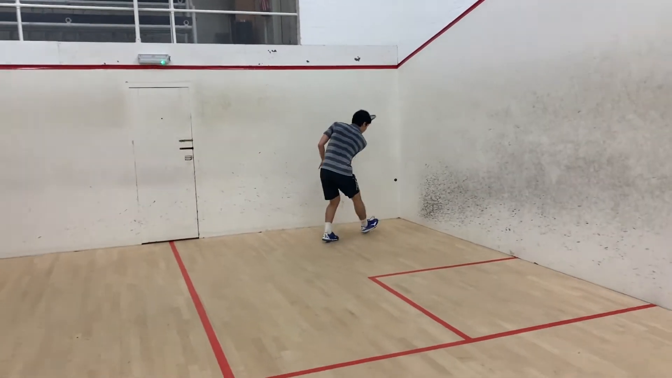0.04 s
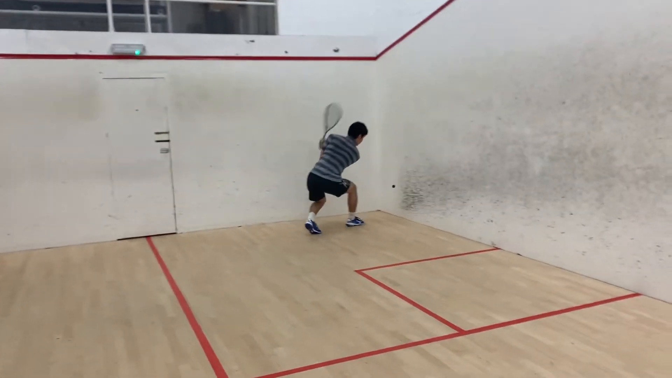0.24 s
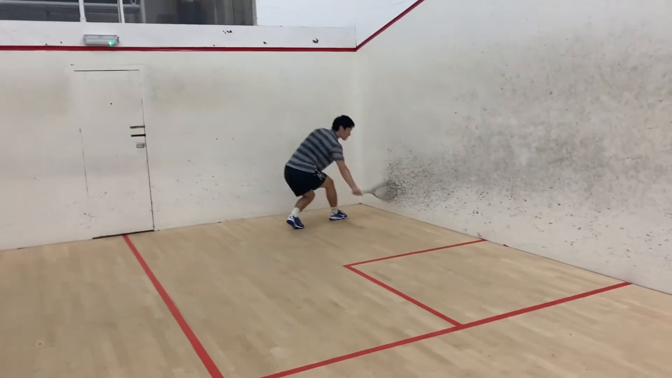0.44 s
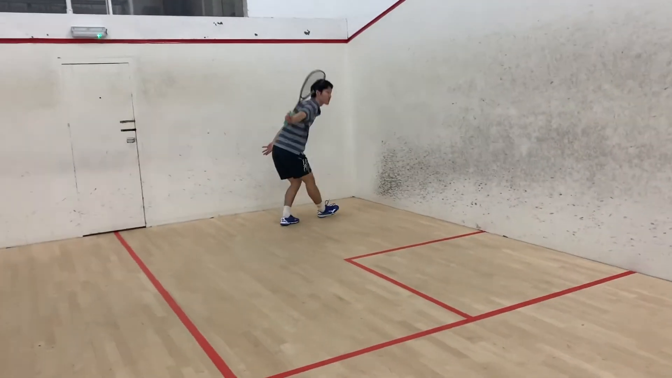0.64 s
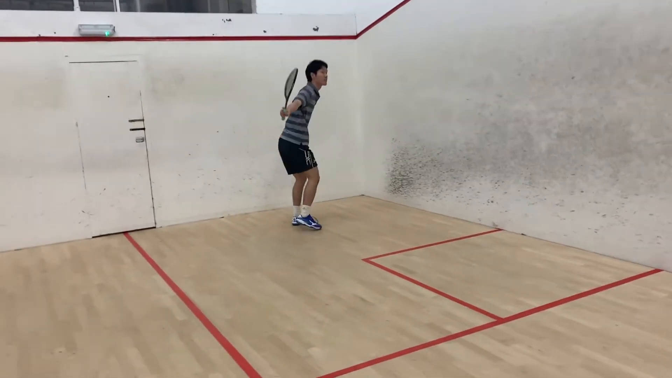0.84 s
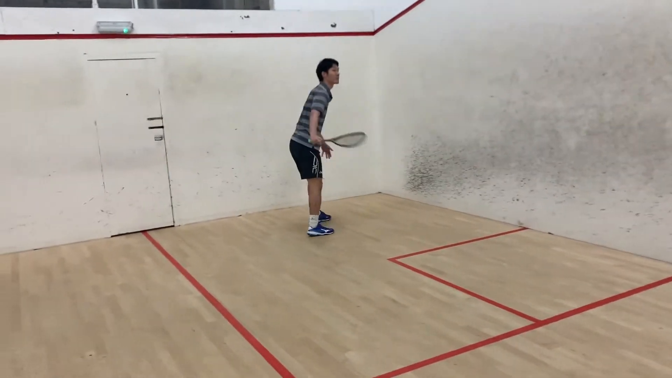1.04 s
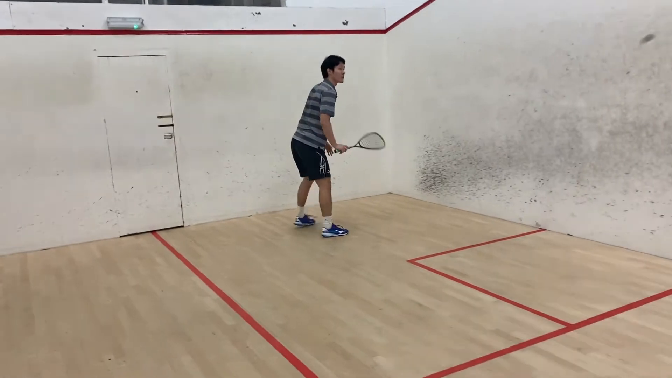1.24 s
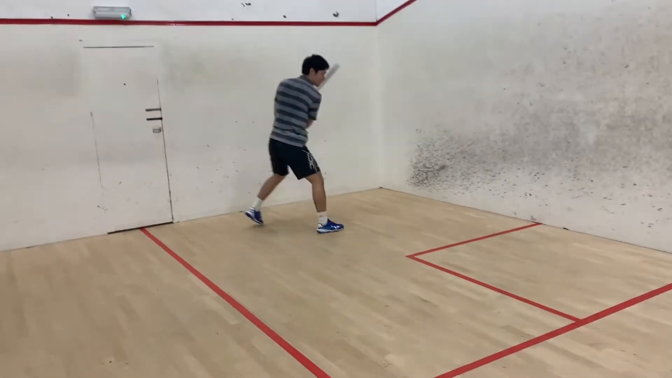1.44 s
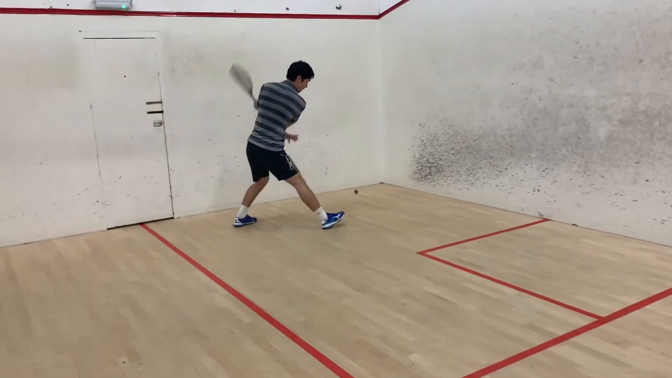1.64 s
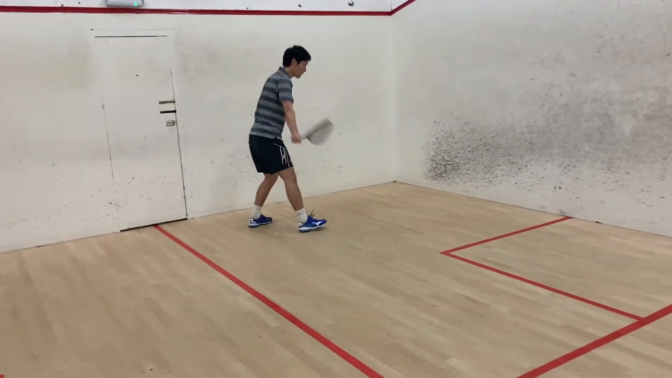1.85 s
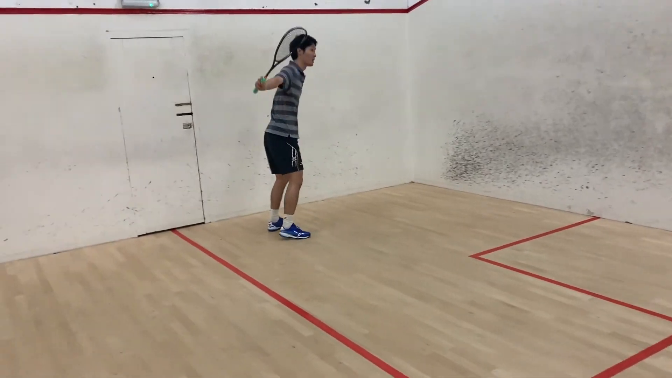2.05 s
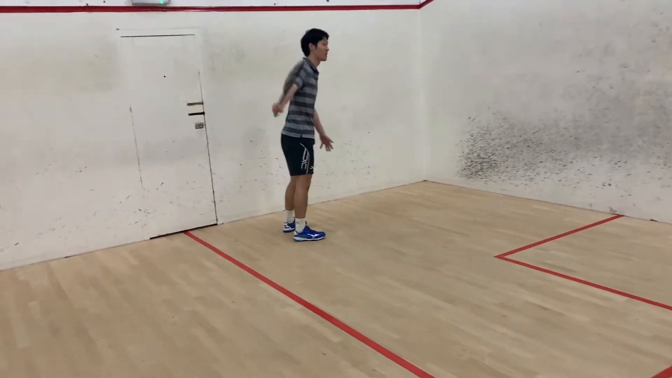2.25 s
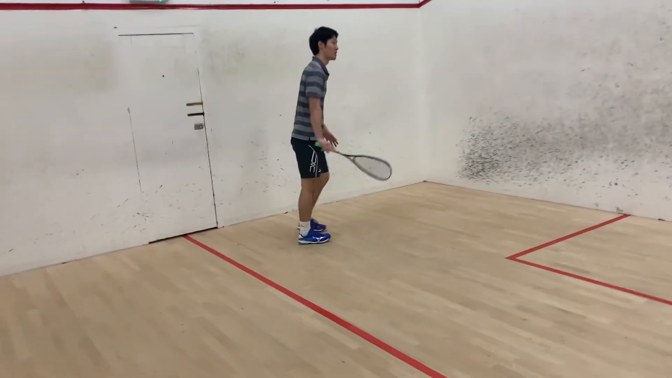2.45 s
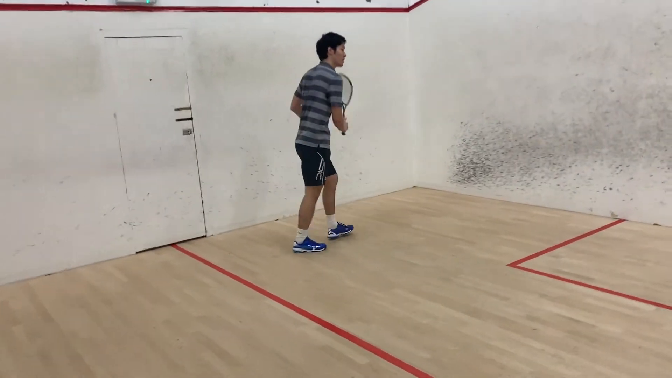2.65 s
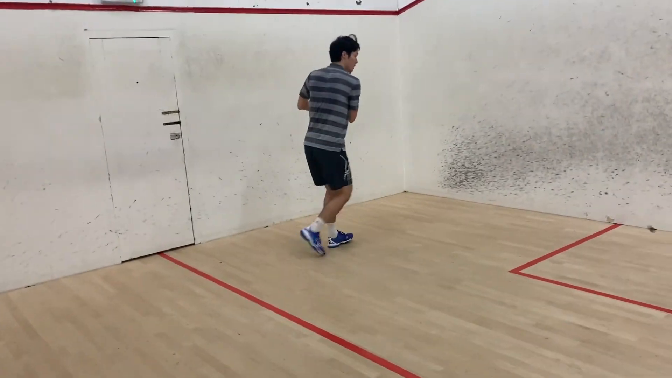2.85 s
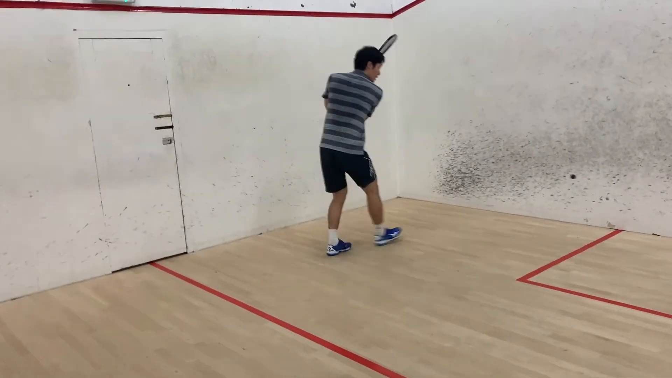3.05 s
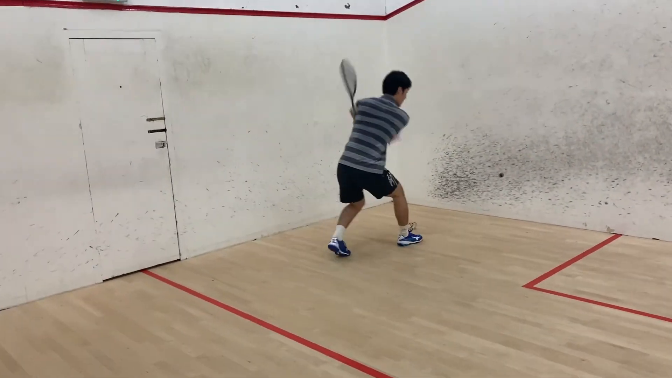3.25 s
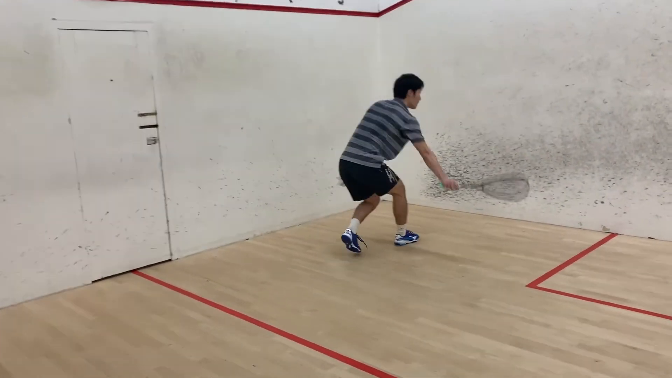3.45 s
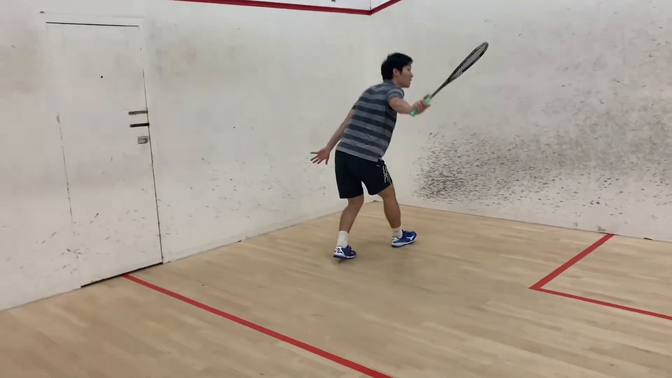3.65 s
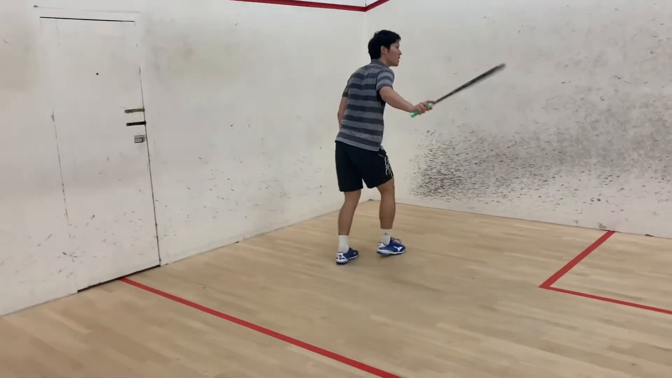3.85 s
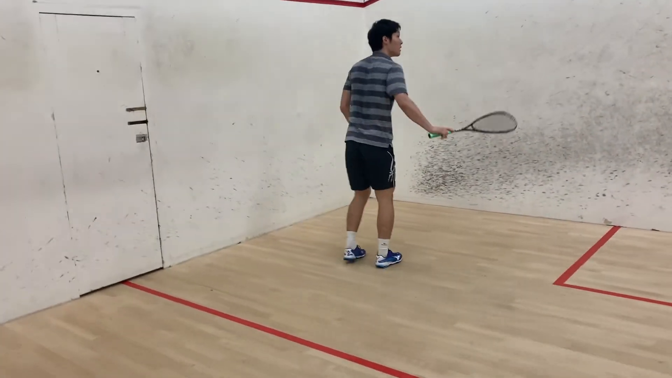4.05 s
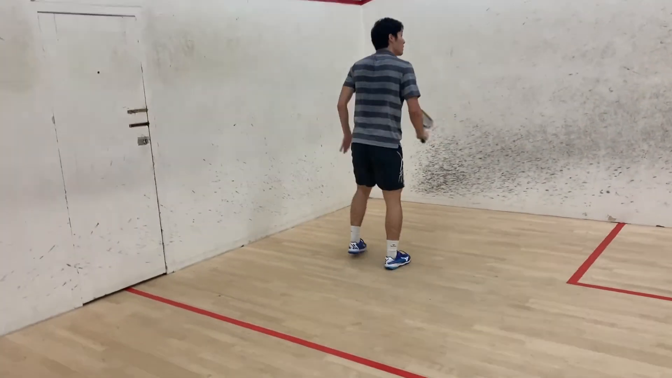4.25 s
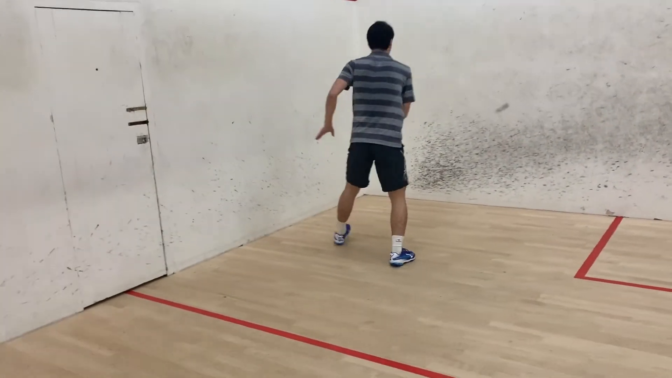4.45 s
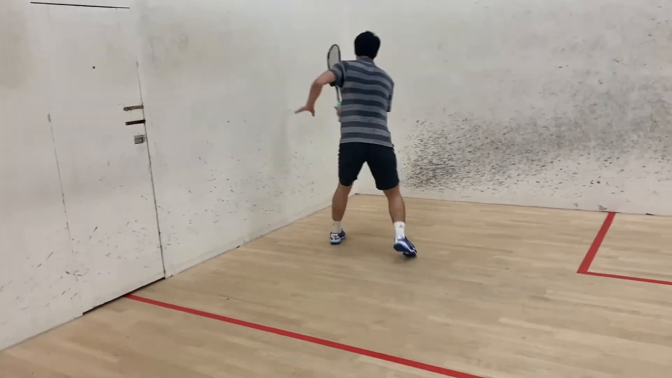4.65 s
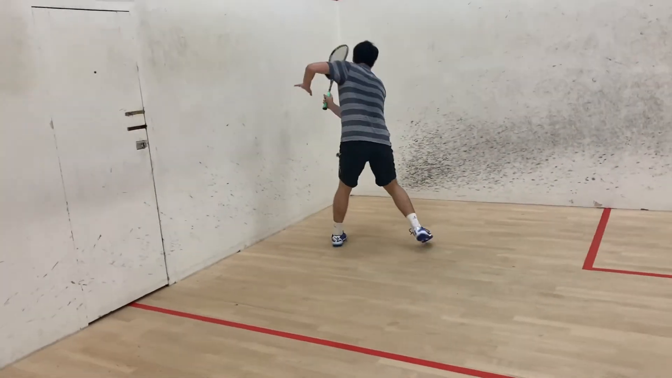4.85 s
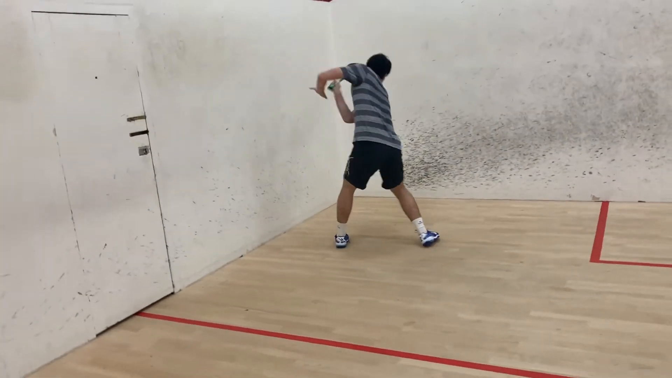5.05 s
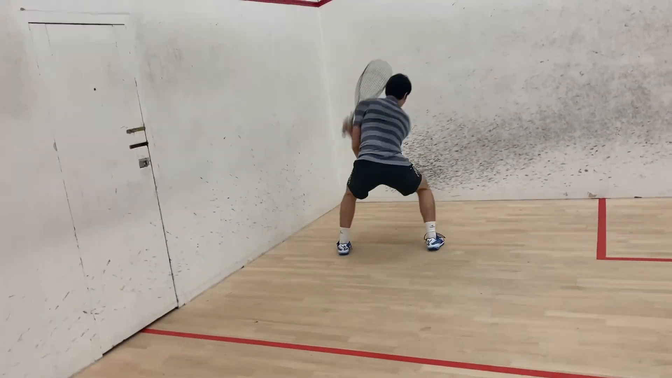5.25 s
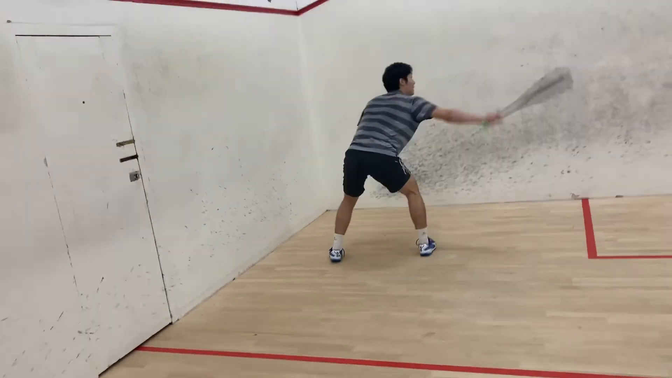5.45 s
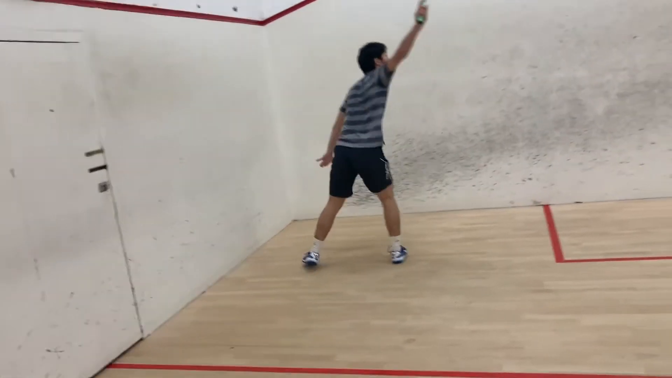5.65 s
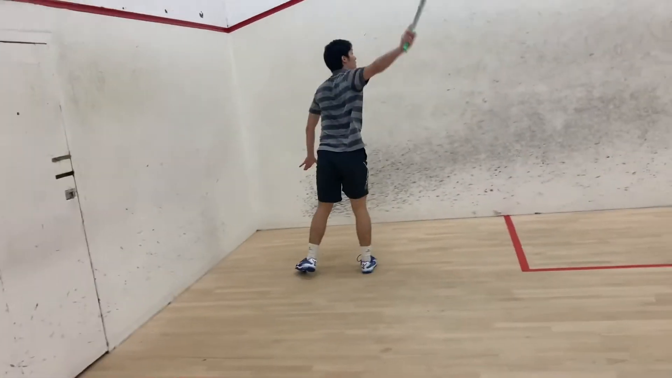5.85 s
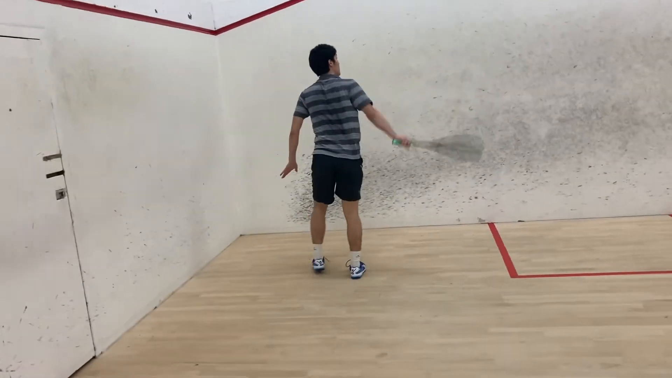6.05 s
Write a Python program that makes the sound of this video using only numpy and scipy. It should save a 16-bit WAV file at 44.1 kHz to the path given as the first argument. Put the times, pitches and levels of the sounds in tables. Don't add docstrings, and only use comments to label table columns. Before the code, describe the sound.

Squash practice in a bare, ringing court: four racket strikes, each followed by a hard crack on the wall, with shoe squeaks and wooden floor thuds.

```python
import sys
import numpy as np
from scipy import signal
from scipy.fft import rfft, irfft, next_fast_len
from scipy.io import wavfile
from scipy.ndimage import uniform_filter1d

SR = 44100
rng = np.random.default_rng(int(sys.argv[2]) if len(sys.argv) > 2 else 0)


def invert_db(level):
    return 10 ** (np.asarray(level, dtype=float) / 20)


def master_out(mix):
    frames = np.transpose(np.atleast_2d(mix))
    ceiling = np.clip(frames, -1, 1)
    pcm = np.round(ceiling * 32767).astype(np.int16)
    wavfile.write(sys.argv[1], SR, pcm)


N = 269451
LEAD = SR
ROOMS = 4
BLOW = np.ones(1)
SOUND_M_S, LENGTH_M, BREADTH_M = 343, 9.75, 6.4
ALONG_S, ACROSS_S = 2 * LENGTH_M / SOUND_M_S, 2 * BREADTH_M / SOUND_M_S

# f/Hz, lag/cycles
PORT_LAG = [(100, .02), (400, .09), (1000, .2), (2300, .14), (6000, .12), (8500, .5), (11000, 1),
            (13550, 1.5), (15900, 2), (18000, 2.4)]


def evened(x):
    return x / np.sqrt(np.mean(x ** 2) + 1e-20)


def peaked(x, db):
    return invert_db(db) * x / np.sqrt(uniform_filter1d(x ** 2, size=180).max() + 1e-20)


def read(points, hz):
    f, value = np.transpose(points)
    return np.interp(np.log(hz + 1), np.log(f + 1), value)


def add(mix, s, sound):
    part = mix[..., LEAD + round(s * SR):][..., :len(sound)]
    part += sound[:part.shape[-1]]


def coloured(x, colour, tilt_db=0.):
    hz = abs(np.fft.fftfreq(8192, 1 / SR))
    octaves = np.log2(np.clip(hz, 150, 9000) / 1000)
    log_gain = np.log(invert_db(read(colour, hz) + tilt_db * octaves))
    taps = np.fft.ifft(np.exp(np.conj(signal.hilbert(log_gain)))).real[:3000]
    return signal.oaconvolve(x, taps)[:max(len(x), 3000)]


def ring(hz, width_hz):
    t = np.arange(3000) / SR
    return np.sin(2 * np.pi * hz * t) * np.exp(-np.pi * width_hz * t)


def knock(db, hz, length_s):
    u = np.linspace(0, 1, round(length_s * SR))
    swell = np.sin(np.pi * u ** 0.66)
    return invert_db(db) * np.sqrt(2) * swell * np.sin(2 * np.pi * hz * length_s * u * (1.03 - .03 * u))


def pop(db, hz, delay_s, rel_db, cycles):
    return delay_s, knock(db + rel_db, hz, cycles / hz)


def spread(z, hz):
    # f/Hz, level/dB
    side_level = [(60, -9), (130, -12.5), (290, -5.5), (640, 2.5), (1410, 3.5), (3100, 1.5), (6820, 0),
                  (15000, 9)]
    # f/Hz, share
    alike = [(6500, 0.19), (8300, 0.99), (17000, .98)]
    mid, side = z[0], z[1] * invert_db(read(side_level, hz))[:, None]
    share = np.clip(read(alike, hz), 0, 1)[:, None]
    shift = np.exp(1j * np.pi * read(PORT_LAG, hz))[:, None]
    diffuse = np.array([mid + side, mid - side])
    one_wave = np.sqrt(2) * np.array([mid / shift, mid * shift])
    both = np.sqrt(1 - share ** 2) * diffuse + share * one_wave
    return signal.istft(both, SR, nperseg=2 * len(hz) - 2)[1]


def hum():
    # f/Hz, level/dB per Hz
    hum_colour = [(18, -49), (30, -6), (202, -10), (550, -21), (930, -15.5), (3430, -31), (7090, -50),
                  (8450, -49), (12000, -58), (15600, -97), (22000, -120)]
    hz, _, z = signal.stft(rng.standard_normal((2, N)), SR, nperseg=2048)
    return invert_db(-47.5) * evened(spread(z * invert_db(read(hum_colour, hz))[:, None], hz)[:, :N])


def court():
    # f/Hz, t60/s
    decay = [(60, 3.34), (130, 1.16), (250, 2.83), (500, 3.47), (1000, 3.46), (2000, 2.76), (4000, 1.93),
             (6000, 1.254), (9000, 1.056), (14000, 0.4)]
    t = np.arange(round(2.6 * SR)) / SR
    density = np.clip((t / .09) ** 2, .15, 1)
    taps = rng.standard_normal((2, len(t))) * (rng.random((2, len(t))) < density) / np.sqrt(density)
    flutter = 1 + 0.096 * np.cos(2 * np.pi * 56 * t) * np.exp(-t / 0.51)
    build_up = 1 - np.exp(-t / .014)
    fade_out = signal.windows.tukey(2 * len(t), .2)[len(t):]
    taps *= flutter * build_up * fade_out
    hz, frame_s, z = signal.stft(taps, SR, nperseg=512)
    return spread(z * invert_db(-60 * frame_s / read(decay, hz)[:, None]), hz) / 22


def scattered(sound, length_s=0.0022, ragged=0.26):
    t = np.arange(900) / SR
    taps = ragged * rng.standard_normal(900) * np.exp(-t / length_s) + (t == 0)
    return signal.oaconvolve(sound, taps / np.linalg.norm(taps))


def ports(x, aligned=0.65):
    size = next_fast_len(len(x))
    shift = np.exp(1j * np.pi * read(PORT_LAG, np.fft.rfftfreq(size, 1 / SR)))
    pair = irfft(rfft(x, size) * np.array([1 / shift, shift]), size)[:, :len(x)]
    round_body = np.array([np.roll(x, 5), np.roll(x, -5)])
    return aligned * pair + (1 - aligned) * round_body


def squeak(length_s, start_hz, db, octave_db):
    n = round(length_s * SR)
    wobble, chatter = uniform_filter1d(rng.standard_normal((2, 4000)), size=60)[:, :n]
    pitch_hz = np.linspace(start_hz, start_hz * (1 - .024), n) * (1 + 0.06 * wobble)
    turn = 2 * np.pi * np.cumsum(pitch_hz) / SR
    swell = np.linspace(0, 1, n) ** 0.93 * signal.windows.tukey(n, .3) * (1 + 1.6 * chatter)
    return invert_db(db) * np.sqrt(2) * swell * (np.sin(turn) + invert_db(octave_db) * np.sin(2 * turn))


def thud(db, tilt_db, board_hz):
    # f/Hz, level/dB per Hz
    thud_colour = [(40, -42.5), (90, -2.5), (200, 2), (400, -12.5), (1000, -27), (3000, -22.5), (8000, -35),
                   (16000, -37.5)]
    tick = peaked(coloured(BLOW, thud_colour, tilt_db), -6.5)
    boards = peaked(ring(board_hz, 25.3) + 0.32 * ring(board_hz * 1.45, 39), -13)
    give = 1 - np.exp(-np.arange(3000) / SR / 0.0017)
    return peaked(tick + boards * give, db)


def board_knocks(db, hz):
    returns = [(0, 0), (ALONG_S, -2.5), (2 * (LENGTH_M + BREADTH_M) / SOUND_M_S, -5)]  # t/s, level/dB
    return [pop(db + d, hz, .005 + s, rel_db=-1.5, cycles=4.5) for s, d in returns]


def swish(db, length_s=0.091):
    # f/Hz, level/dB per Hz
    swish_colour = [(100, -31), (400, 13.5), (1200, 3.5), (3500, -1), (8000, -6), (16000, -17)]
    t = np.arange(-length_s, .02, 1 / SR)
    speed = np.exp(np.minimum(t / 0.02, -t / 0.0034))
    air = coloured(rng.standard_normal(len(t)), swish_colour)
    return invert_db(db) * evened(air)[:len(t)] * speed


def stroke(db, ball_hz):
    # f/Hz, width/Hz, level/dB
    racket = [(882, 63, -1.5), (1050, 42, -8.5), (1626, 53, -17), (2320, 290, -15), (3400, 450, -17),
              (4500, 410, -11)]
    # f/Hz, level/dB per Hz
    stroke_colour = [(40, -13.5), (100, -16), (340, 1.5), (640, -8), (1060, -8.5), (1300, -5.5),
                     (1900, -17), (6500, -23.5), (11000, -26), (16000, -31.5)]
    slap = coloured(BLOW, stroke_colour, tilt_db=-.6)
    modes = ring(ball_hz, 82) + sum(invert_db(d + 1.2) * ring(f, w) for f, w, d in racket)
    return peaked(peaked(slap, 0) + peaked(modes, -7), db)


def stroke_followers(db, strings_hz, ball_hz):
    # t/s, level/dB
    snaps = [(.0008, -9), (.0028, -9), (.007, -11), (.020, -14)]
    string_ping = pop(db, strings_hz, delay_s=.0008, rel_db=-5, cycles=7)
    ball_pop = pop(db, ball_hz, delay_s=.003, rel_db=-4, cycles=4)
    slaps = [(s, scattered(crack(db + d, tilt_db=.7), .0015, .3)) for s, d in snaps]
    return [string_ping, ball_pop] + slaps


def crack(db, tilt_db, ring_hz=300, ring_db=-40):
    # f/Hz, level/dB per Hz
    crack_colour = [(40, -39), (100, -12), (350, 1), (700, -5), (1050, -7), (1220, -16.5), (1700, -9),
                    (2300, -11.5), (4000, -16), (7400, -21), (12000, -20), (16000, -32.5)]
    click = coloured(BLOW, crack_colour, tilt_db)
    rings = ring(ring_hz, 0.19 * ring_hz) + 0.74 * ring(2.44 * ring_hz, 0.3 * ring_hz)
    return peaked(peaked(click, 0) + peaked(rings, ring_db), db)


def crack_returns(db, tilt_db, wall_hz, side_m):
    side_s, floor_s = side_m / SOUND_M_S, .9 / SOUND_M_S
    # t/s, level/dB; first the slap at the front of the crack
    paths = [(.0009, -3.5), (floor_s, -1.2), (side_s, -1.8), (ACROSS_S, -6), (ALONG_S, -7)]
    clicks = [(s, scattered(crack(db + d, tilt_db + 1.3), 0.002, 0.29)) for s, d in paths]
    booms = [pop(db - 5 * tilt_db, 370, s, d, cycles=3.1) for s, d in [(.0025, -7.5), (ACROSS_S + .003, -7)]]
    bunches = [(side_s - .002, -8 + 3 * tilt_db), (ACROSS_S + .002, -3), (ALONG_S - .002, -5.5)]
    clangs = [(s, knock(db + d, .86 * wall_hz, .011)) for s, d in bunches]
    flash = knock(db - 12 + 4 * tilt_db, 2.35 * wall_hz, .0075)
    return clicks + booms + clangs + [(0, flash), (side_s, flash)]


def scene():
    # t/s, peak level/dB, court level/dB, string bed f/Hz, ball f/Hz
    strokes = [
        (.460, -11.5, -5, 876, 385),
        (1.837, -20, 0.3, 1075, 345),
        (3.460, -17, -3.5, 790, 320),
        (5.422, -10.5, -6, 970, 292),
    ]
    # t/s, peak level/dB, brightness/dB per octave, wall ring f/Hz, side wall detour/m
    cracks = [
        (-.95, -16.5, .1, 912, 3.5),
        (.695, -13.5, .22, 700, 3.8),
        (2.057, -12, -.2, 357, 2.7),
        (3.674, -13, .2, 860, 2.1),
        (5.602, -13.5, 2, 1000, 5),
    ]
    # t/s, peak level/dB, brightness/dB per octave, court level/dB, board f/Hz
    thuds = [(0.068, -41, -1.2, -1, 170), (1.577, -47, 5, -6, 257), (1.640, -35.5, -1.1, 1, 137),
             (1.654, -28, -1.35, -4.5, 126), (2.886, -26.5, -1.14, -5, 152), (3.227, -34, -1.4, -5, 168),
             (4.56, -43, -1.9, 2, 116), (4.702, -27, 0.46, -9, 255), (4.724, -24.5, -3, -7, 165),
             (4.968, -34, -3, -13, 235), (5.002, -35, -8, -6, 116), (5.19, -44, -10, -6, 90)]
    # t/s, length/s, start f/Hz, level/dB, octave level/dB
    squeaks = [
        (1.781, .015, 3930, -21.5, -11),
        (1.789, 0.045, 4480, -23, -8),
        (1.821, .031, 4405, -11, -16),
        (1.972, 0.016, 3370, -27, 1.5),
        (3.395, .08, 1105, -38, -22),
    ]
    courts, building = [court() for _ in range(ROOMS)], hum()
    direct, sent = np.zeros(LEAD + N), np.zeros((ROOMS, LEAD + N))
    sounds, near = [], []
    for s, db, court_db, strings_hz, ball_hz in strokes:
        sounds += [(s, stroke(db, ball_hz), court_db), (s - .09, swish(.6 * db - 22), -12)]
        frame_hum = ring(1080, 22)
        add(sent[1], s, peaked(frame_hum, db + court_db - 19))
        near += [(s, stroke_followers(db, strings_hz, ball_hz))]
    for s, db, tilt_db, wall_hz, side_m in cracks:
        ring_db = -17 + 6.5 * tilt_db
        sounds += [(s, crack(db, tilt_db, wall_hz, ring_db), -2)]
        near += [(s, crack_returns(db, tilt_db, wall_hz, side_m))]
    for s, db, tilt_db, court_db, hz in thuds:
        sounds += [(s, thud(db, tilt_db, hz), court_db)]
        near += [(s, board_knocks(db, hz))]
    for k, (s, sound, court_db) in enumerate(sounds):
        add(direct, s, scattered(sound))
        add(sent[k % ROOMS], s, invert_db(court_db) * sound)
    for s, length_s, hz, db, octave_db in squeaks:
        sound = squeak(length_s, hz, db, octave_db)
        add(direct, s, sound)
        add(sent[0], s, invert_db(-17.5) * sound)
    for s, followers in near:
        for delay_s, sound in followers:
            add(direct, s + delay_s, sound)
    wet = sum(signal.fftconvolve(x[None], tail, axes=1)[:, :LEAD + N] for x, tail in zip(sent, courts))
    balance = invert_db(np.array([[.6], [-.6]]))
    return (ports(direct) + wet)[:, LEAD:] * balance + building


def thinned(x, from_hz=7800, below_db=-7, faint_db=-101):
    hz, _, z = signal.stft(np.array([x[0] + x[1], x[0] - x[1]]) / 2, SR, nperseg=1024)
    treble = hz > from_hz
    patch = abs(uniform_filter1d(abs(z[:, treble]) ** 2, size=5, axis=1)) + 1e-20
    both = patch.mean(0)
    margin_db = np.minimum(10 * np.log10(patch / both) - below_db, 10 * np.log10(patch) - faint_db)
    z[:, treble] *= np.clip(margin_db / 2, 0, 1)
    mid, side = signal.istft(z, SR, nperseg=1024)[1][:, :N]
    return np.array([mid + side, mid - side])


def top_cut(x):
    return signal.sosfilt(signal.butter(12, 17000, fs=SR, output="sos"), x)


def record(dry):
    # f/Hz, level/dB
    mic = [(20, -46), (45, -4.5), (80, 3), (200, 1), (15800, 5.5), (16200, -22), (17200, -69)]
    x = np.array([coloured(channel, mic) for channel in dry])
    overloaded = np.tanh(0.89 * x) / .9
    return top_cut(thinned(overloaded))


dry = scene()
out = record(dry)
master_out(out)
```